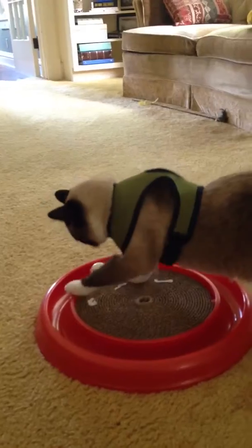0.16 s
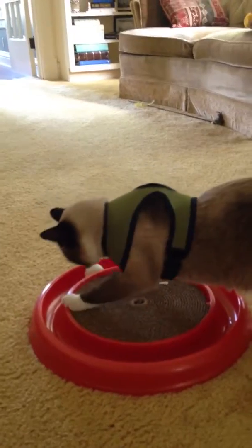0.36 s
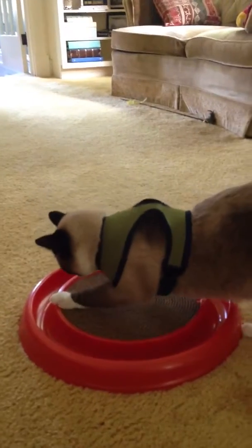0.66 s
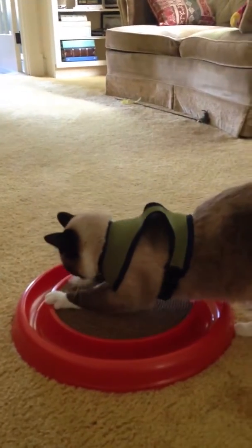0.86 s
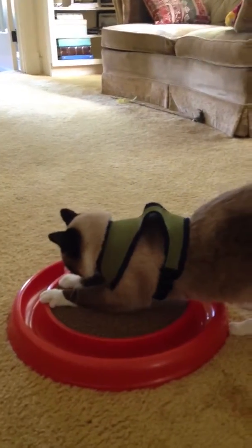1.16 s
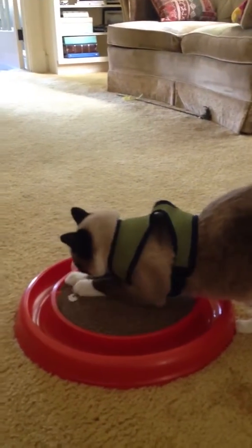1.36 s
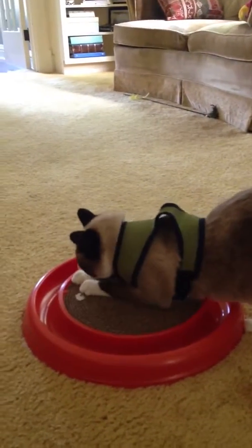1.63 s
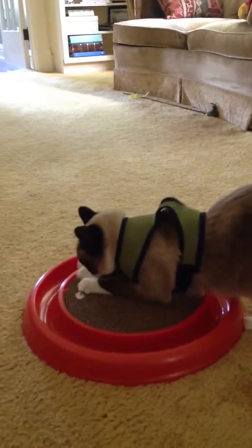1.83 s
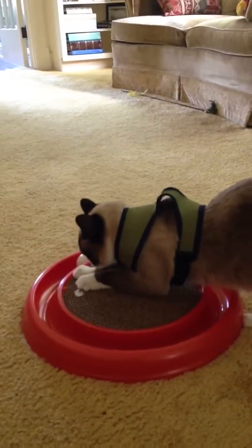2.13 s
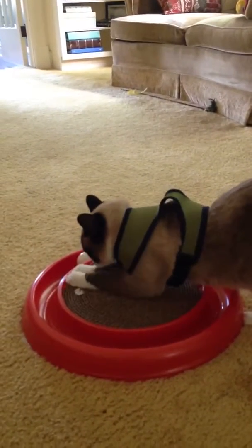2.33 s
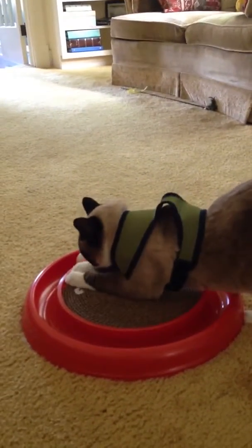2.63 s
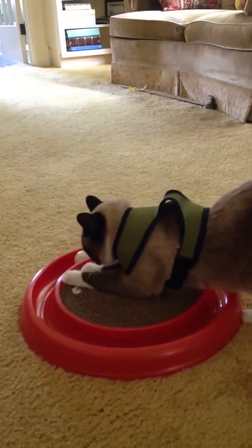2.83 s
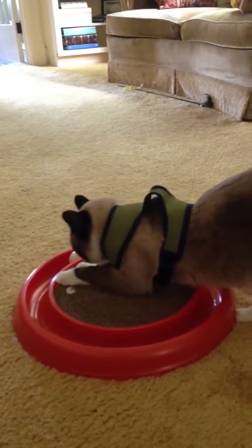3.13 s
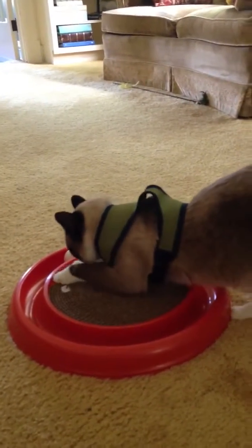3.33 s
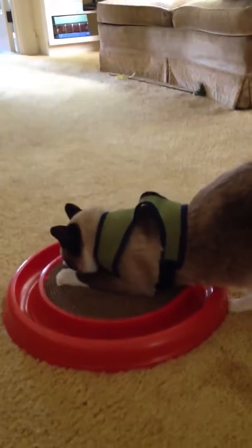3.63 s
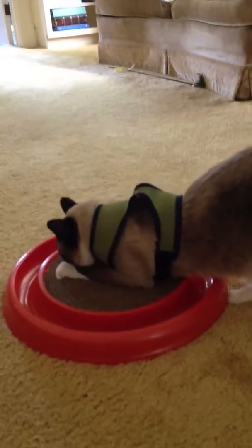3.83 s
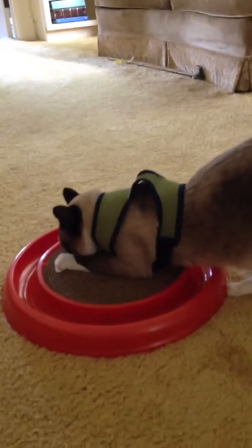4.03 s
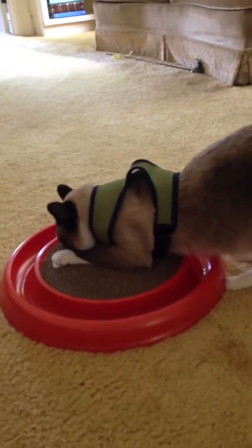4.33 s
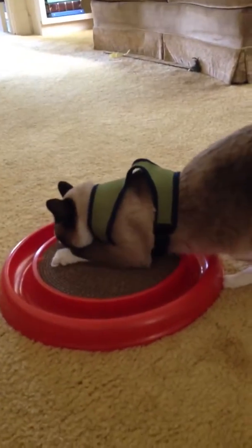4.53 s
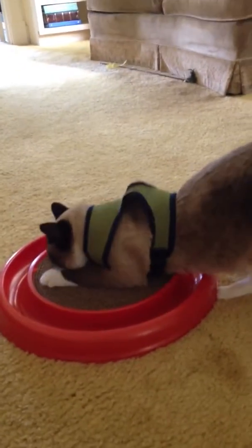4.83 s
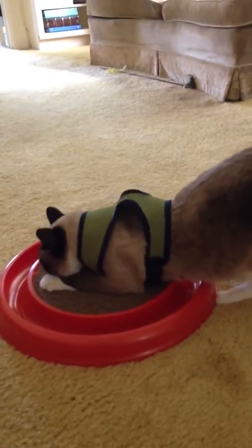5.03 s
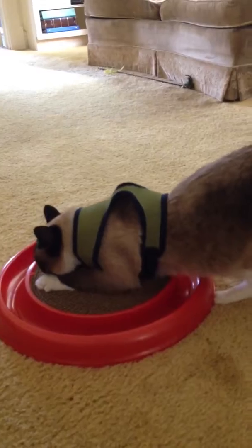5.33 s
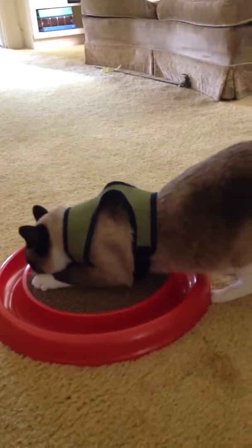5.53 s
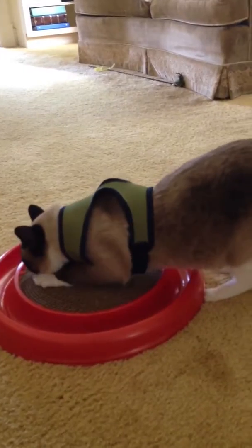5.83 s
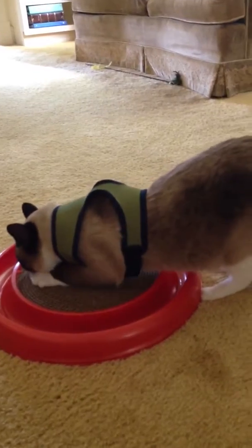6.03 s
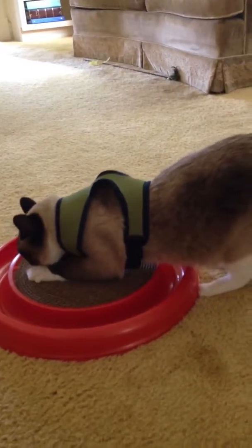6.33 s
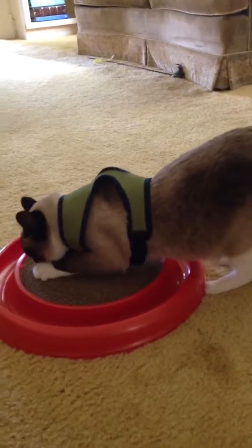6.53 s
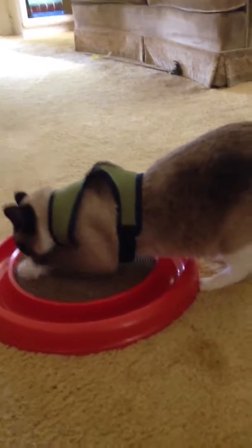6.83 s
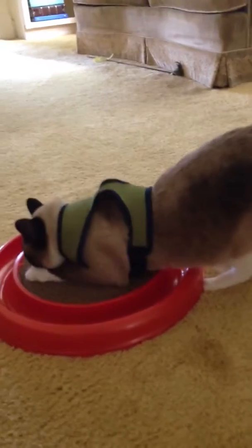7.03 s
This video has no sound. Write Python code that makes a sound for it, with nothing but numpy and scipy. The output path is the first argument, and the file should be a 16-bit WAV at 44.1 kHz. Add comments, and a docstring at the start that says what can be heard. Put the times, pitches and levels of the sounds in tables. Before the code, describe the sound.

A cat works its claws into a cardboard scratching pad set in a plastic ring. After faint first touches, dry papery snaps, tiny fibre ticks and short hollow thumps come irregularly, some single, some in tight pairs, with soft paw rustle between. Small carpeted living room with short damped echoes, close phone microphone, one channel, over a faint fading low hum and quiet hiss.

```python
"""A cat works its claws into a corrugated cardboard pad set in a round plastic tray, on a living-room carpet.
Each claw that lets go tears fibres (noisy tick), snaps a paper wall (short ringing) and thumps the pad
in its tray (low ringing). In between, paws rustle: thousands of tiny random breaks and skipping claw tips.
The ceiling and a small damped room answer with echoes and a tail, over a faint fading hum and hiss."""
import sys
import numpy as np
from scipy import signal
from scipy.fft import rfft, irfft
from scipy.io import wavfile
from scipy.ndimage import uniform_filter1d

SR = 44100
rng = np.random.default_rng(int(sys.argv[2]) if len(sys.argv) > 2 else 0)


def dump(signal):
    """Clip the signal to [-1, 1] and save it as 16-bit WAV at the path in sys.argv[1]."""
    limited = np.clip(np.atleast_2d(signal).T, -1, 1)
    pcm = np.round(limited * 32767).astype(np.int16)
    wavfile.write(sys.argv[1], SR, pcm)


N = 316638  # length in samples

# claws letting go: time [t/s], paper snap [f/Hz], snap [level/dB], edge crack [level/dB],
# fibre tick [level/dB], thump [f/Hz], thump [level/dB]
SNAGS = [(0.7955, 2140, -51.5, -51.5, -53, 176, -49.5), (0.8551, 2250, -63, -72, -85, 326, -60),
         (1.0417, 1400, -63, -89, -87, 308, -62.5), (1.109, 1568, -46.5, -47, -60, 275, -48.5),
         (1.3698, 1900, -66.5, -72, -71, 312, -76), (1.426, 1280, -69.5, -85, -79, 325, -57),
         (1.7812, 1880, -48, -61, -53.5, 280, -37.5), (1.7894, 1432, -62, -55, -80, 294, -36),
         (1.8008, 1570, -48.5, -65, -54.5, 256, -49), (1.9423, 1517, -28, -44, -50.5, 305.3, -31),
         (2.0545, 1536, -40.5, -64, -77, 290, -42), (2.2034, 1330, -52, -53, -57, 290, -45.5),
         (2.2165, 1860, -57.5, -79, -65, 323, -48), (2.3171, 1880, -68, -61.5, -62.5, 300, -54),
         (2.3475, 1520, -53, -83, -66, 318, -71), (2.4756, 1360, -52.5, -67, -60.5, 300, -48.5),
         (2.7099, 1515, -44, -86, -58.5, 288, -39.5), (2.8142, 1840, -34.5, -48.5, -48, 321, -34),
         (3.054, 1440, -61, -74, -84, 180, -84), (3.0852, 1366, -55.5, -65, -67, 200, -45),
         (3.0955, 1750, -33.5, -46, -47.5, 297.6, -39.5), (3.304, 1750, -39.5, -46.5, -49, 311, -40),
         (3.4344, 1888, -56.5, -80, -77, 271, -37), (3.7344, 1535, -58.5, -78, -75, 192, -62),
         (3.7982, 1520, -41.5, -46.5, -62, 275, -47.5), (3.9468, 1190, -45.5, -83, -80, 296, -35),
         (4.0379, 1990, -57, -83, -83, 275, -53.5), (4.2955, 1795, -25.5, -42, -48.5, 200, -35.5),
         (4.4189, 2080, -50, -75, -60, 293, -44), (4.4226, 1870, -42.5, -63, -53, 292, -40.5),
         (4.7509, 1590, -61, -94, -97, 310, -46), (5.207, 1494, -36.5, -45.5, -57, 273, -32),
         (5.6237, 1810, -49, -60, -62, 374.5, -52.5), (5.682, 1880, -32, -37, -38.5, 296, -27.5),
         (5.969, 3040, -63, -73.5, -59.5, 284.5, -52.5), (6.1204, 1310, -59.5, -59, -75, 228, -38.5),
         (6.13, 1220, -62, -65, -67, 294, -40), (6.3315, 2390, -46.5, -55, -80, 315.5, -40.5),
         (6.5808, 1840, -41.5, -61, -60, 333, -35.5), (6.606, 2270, -52.5, -52, -56, 278, -75),
         (6.8918, 1930, -68, -73, -67.5, 316, -57.5), (6.9557, 1940, -70.5, -76, -78, 317, -53.5)]
# a paper wall of the corrugation: multiple of the snap pitch [1], strength [level/dB], time to fall 60 dB [t/s]
PAPER_WALL = [(0.841, -6.5, 0.013), (1.0, 5, 0.002), (1.22, -8, 0.01), (1.62, -25, 0.009)]
# the plastic tray's ringing: pitch [f/Hz], strength [level/dB], time to fall 60 dB [t/s]
PLASTIC_TRAY = [(530, -1, 0.013), (709, 3.5, 0.0092), (811, -2.5, 0.015), (1225, -7, 0.0118)]
LEAD_S = .03  # the claw or paw starts to drag or scuff this long before its main moment


def undb(db):
    """Turn decibels into a plain factor."""
    return 10 ** (np.asarray(db) / 20)


def level(x, db):
    """Set the rms (average) level."""
    return x * undb(db) / np.sqrt(np.mean(x ** 2))


def blow(x, db):
    """Set the energy of a short sound, as a level over 10 ms."""
    return x * undb(db) * np.sqrt(.01 * SR / np.sum(x ** 2))


def fade(t, t60):
    """Exponential decay that starts at t = 0 and falls 60 dB in t60 seconds."""
    return (t >= 0) * np.exp(-np.log(1000) * np.maximum(t, 0) / t60)


def ring(t, modes, hz=1):
    """Fading tones struck at t = 0; neighbours swing in opposite directions."""
    total = 0
    for k, (f, db, t60) in enumerate(modes):
        total = total + (-1) ** k * undb(db) * fade(t, t60) * np.sin(2 * np.pi * f * hz * t)
    return total


def vary(modes):
    """Tones shift a little at random in pitch and level with every snag or bump."""
    return [(f * rng.normal(1, .03), db + rng.normal(0, 2), t60) for f, db, t60 in modes]


def colour(x, points, size=2048):
    """Shape the spectrum through (f/Hz, level/dB) points, with a filter that never sounds ahead of its input."""
    hz, db = np.transpose(points)
    f = np.maximum(np.fft.rfftfreq(size, 1 / SR), 1)
    gain = undb(np.interp(np.log(f), np.log(hz), db))
    # folding the cepstrum gathers the filter's energy at its start
    cepstrum = irfft(np.log(gain))
    cepstrum[1:size // 2] *= 2
    cepstrum[size // 2 + 1:] = 0
    impulse = irfft(np.exp(rfft(cepstrum)))
    return signal.fftconvolve(x, impulse)[:len(x)]


def cut(x, hz, kind, order=2):
    """Low-pass, high-pass or band-pass."""
    return signal.sosfilt(signal.butter(order, np.minimum(hz, .45 * SR), kind, fs=SR, output="sos"), x)


def walk(rate):
    """Slow random drift with a spread of 1."""
    k = int(SR / rate)
    steps = np.repeat(rng.standard_normal(N // k + 1), k)
    drift = uniform_filter1d(uniform_filter1d(steps, k), k)[:N]
    return drift / drift.std()


def crackle(count, rate, spread_db):
    """Tiny breaks at random moments (rate per second), of very uneven size."""
    breaks = rng.random(count) < rate / SR
    return breaks * rng.standard_normal(count) * undb(spread_db * rng.standard_normal(count))


def claws(count=4):
    """Every snag and bump at its moment, dealt in turn to a few groups; each group gets its own random room tail."""
    # paws pressing the pad down into its tray: time [t/s], thump [f/Hz], thump [level/dB]
    bumps = [(0.762, 246, -49.5), (1.568, 274, -56), (1.843, 209, -39.5), (4.1313, 290, -46.5),
             (4.8219, 289, -51.5), (5.2208, 311, -36), (5.669, 280, -37), (6.1798, 296, -44),
             (6.586, 179, -41.5), (7.037, 330, -64)]
    groups = np.zeros((count, N + SR))
    events = [(s, snag(*row)) for s, *row in SNAGS]
    events += [(s, bump(*row)) for s, *row in bumps]
    for k, (s, sound) in enumerate(events):
        start = int((s - LEAD_S) * SR)
        groups[k % count, start:start + len(sound)] += sound
    return sum(room(group[:N]) for group in groups)


def snag(snap_hz, snap_db, crack_db, tick_db, thump_hz, thump_db, count=4096):
    """A claw drags, fibres part, a paper wall flicks free and slaps the next; the heavier pad and tray ring too."""
    # tearing fibres: pitch [f/Hz], strength [level/dB]
    fibres = [(1500, -6.5), (3000, -1), (4400, -3), (5500, -3.5), (7900, 0), (10300, -8.5), (12500, -15),
              (16000, -25.5)]
    # the stiff cut edge of the card: pitch [f/Hz], strength [level/dB], time to fall 60 dB [t/s]
    card_edge = [(3410, 0.5, 0.0075), (3560, 0, 0.0046), (4066, 6, 0.0041)]
    t = np.arange(count) / SR - LEAD_S
    # the claw slips in small jerks, harder as the load grows
    jerks = crackle(count, rate=2300, spread_db=2) * fade(-t, 0.04)
    drag = cut(jerks, (230, 2400), "band", order=3)
    # the drag grows with the snap (9 dB below it) until the claw slips freely
    drag_db = min(snap_db - 9, -52.5)
    # most fibres part at once, a few straggle
    tear = blow(crackle(count, rate=15000, spread_db=3) * fade(t, 0.0065), 0)
    stragglers = blow(crackle(count, rate=1500, spread_db=4) * fade(t, .035), -10)
    tick = colour(tear + stragglers, fibres)
    crack = ring(t, vary(card_edge))
    # the wall meets its neighbour after two swings
    slap_s = 2 / snap_hz
    wall = vary(PAPER_WALL)
    flick = ring(t, wall, snap_hz) + undb(-5) * ring(t - slap_s, wall, snap_hz)
    # frayed edges turn the paper's ring into a crunch
    fray = cut(crackle(count, rate=12000, spread_db=5) * fade(t, 0.032), 1130, "high", order=3)
    snap = cut(blow(flick, 0) + blow(fray, -3.2), (1080, 3600), "band", order=5)
    paper = blow(drag, drag_db) + blow(snap, snap_db) + blow(crack, crack_db) + blow(tick, tick_db)
    # snap and thump both knock the tray, 3.5 dB under their mean
    knock_db = (snap_db + thump_db) / 2 - 3.5
    return paper + tray(t, knock_db, thump_hz, thump_db)


def tray(t, knock_db, thump_hz, thump_db):
    """The pad bounces with low fading tones and, half a millisecond later, the plastic tray under it knocks."""
    # the pad bouncing: multiple of the thump pitch [1], strength [level/dB], time to fall 60 dB [t/s]
    pad = [(0.562, -15, 0.058), (.88, 1.5, 0.057), (1.1, 4.5, 0.025)]
    knock = cut(ring(t - .0005, vary(PLASTIC_TRAY)), (300, 1500), "band")
    thump = cut(ring(t, pad, thump_hz), 150, "high", order=3)
    return blow(knock, knock_db) + blow(thump, thump_db)


def bump(thump_hz, thump_db, count=4096):
    """A soft paw scuffs the card and pushes the pad against the tray."""
    t = np.arange(count) / SR - LEAD_S
    scuff = cut(crackle(count, rate=4300, spread_db=11) * fade(np.abs(t), 0.033), (400, 2600), "band")
    # a soft paw stirs the paper and the tray only a little
    scuff_db, knock_db = thump_db - 23, thump_db - 17.5
    return blow(scuff, scuff_db) + tray(t, knock_db, thump_hz, thump_db)


def paws(count=1024):
    """Soft pads rustle in fits and starts over the cut edges of the card; claw tips skip from wall to wall."""
    # the rustle's colour: pitch [f/Hz], strength [level/dB]
    rustle_colour = [(120, -21), (300, 14), (600, 2), (1000, -8.5), (1900, -4), (3200, -8), (6000, -17),
                     (15000, -16.5)]
    skip_hz, skip_db = 1600, -3.5  # pitch of the skipped walls, and their level over the rustle
    fits_db = 3 * walk(30)
    grains = crackle(N, rate=2000, spread_db=4.0) * undb(fits_db)
    rustle = level(colour(grains, rustle_colour), 0)
    t = np.arange(count) / SR
    wall = blow(ring(t, PAPER_WALL, skip_hz), 0) + blow(ring(t, PLASTIC_TRAY), 3)
    skips = signal.oaconvolve(crackle(N, rate=200, spread_db=3), wall)[:N]
    return room((rustle + level(skips, skip_db)) * rubbing())


def rubbing():
    """How hard the paws rub: a light shuffle, a slide after each snag and some short strokes."""
    # short paw scrapes, alone or along with a snag: middle [t/s], length [t/s], strength [level/dB]
    scrapes = [(0.672, 0.021, -61), (0.774, 0.027, -59), (1.109, 0.023, -53.5), (1.295, .02, -66),
               (1.341, 0.018, -62), (1.402, .05, -69), (3.939, 0.022, -57.5), (6.597, 0.02, -45.5),
               (4.046, 0.11, -67), (5.086, 0.065, -70), (5.475, 0.064, -70), (5.678, 0.025, -43.5),
               (6.118, 0.022, -52), (6.175, 0.0089, -77), (7.04, 0.012, -68.5), (7.097, 0.018, -64.5)]
    # the paws shuffle from the moment they settle, more as the cat leans in
    settle_s, shuffle_db, lean_db_per_s = 0.83, -82, 0.56
    # after a snag the freed paw slides on (dB over the thump) and comes to rest
    slide_db, slide_t60_s = -23.5, .35
    t = np.arange(N) / SR
    shuffle = (t > settle_s) * undb(shuffle_db + lean_db_per_s * (t - settle_s))
    slides = sum(undb(thump_db + slide_db) * fade(t - s, slide_t60_s) for s, *_, thump_db in SNAGS)
    strokes = sum(undb(db) * np.exp(-(2 * (t - s) / length) ** 2) for s, length, db in scrapes)
    return shuffle + slides + strokes


def room(x, count=16384):
    """Add a few early echoes and a short tail that loses its treble first."""
    # the tail's strength: pitch [f/Hz], strength [level/dB]
    tail_bands = [(90, 7), (170, -8), (320, -12.5), (600, -4), (1200, -12), (2400, -9.5), (4500, -14.5),
                  (9000, -18), (15000, -6.5)]
    # carpet and sofa soak it up quickly: pitch [f/Hz], time to fall 60 dB [t/s]
    soaking = [(150, .3), (600, .24), (2500, .24), (15000, .13)]
    # the room's standing waves: pitch [f/Hz], strength [level/dB], time to fall 60 dB [t/s]
    standing = [(167.8, -76, 0.28), (255.2, -89, 0.42), (312.3, -67.5, 0.27)]
    # ceiling and furniture: delay [t/s], strength [level/dB], low-pass [f/Hz]
    echoes = [(.0058, -12, 2006), (0.0123, -12.5, 4097), (0.0157, -10.5, 700), (0.0174, -21.5, 5600),
              (0.03, -24.5, 1492)]
    t = np.arange(count) / SR
    hz, db = np.transpose(tail_bands)
    t60 = np.interp(hz, *np.transpose(soaking))
    log_f = np.log(np.maximum(np.fft.rfftfreq(count, 1 / SR), 1))
    noise = rfft(rng.standard_normal(count))
    tail = ring(t - .013, standing)
    build_up = np.clip((t - .004) / 0.0092, 0, 1)
    # each band of noise fades at its own pace; neighbouring bands overlap
    for k, share in enumerate(np.eye(len(hz))):
        shape = fade(t, t60[k]) * build_up
        band = irfft(noise * np.interp(log_f, np.log(hz), share))
        tail = tail + undb(db[k]) * band * shape / np.sqrt(np.sum(shape ** 2))
    for s, echo_db, top_hz in echoes:
        # soft surfaces smear each echo in time
        smear = np.maximum(1 - np.abs(2 * top_hz * (t - s)), 0)
        tail = tail + undb(echo_db) * smear / smear.sum()
    return x + signal.oaconvolve(x, tail)[:N]


def background():
    """An appliance's wavering hum slowly fades in quiet, hissing air whose low murmur swells and sinks."""
    # still air and microphone hiss: pitch [f/Hz], strength [level/dB]
    air_colour = [(25, -17), (60, -12), (95, -5), (135, 13), (200, 16), (300, 9), (500, 3), (1000, -5),
                  (1800, -5), (3500, -3), (8000, -5), (15000, -6)]
    hum_hz, hum_db, hum_db_per_s = 166.5, -69.5, -1.5  # mean pitch, level before the fade, fade
    air_db = -65.5  # before the murmur moves
    murmur_hz, murmur_swell_db = 450, 3  # the murmur lies below this pitch; spread of its level
    turns = np.cumsum(1 + 0.004 * walk(3.5)) / SR
    hum_change_db = hum_db_per_s * np.arange(N) / SR + walk(14)
    hum = level(np.sin(2 * np.pi * hum_hz * turns), hum_db) * undb(hum_change_db)
    air = level(colour(rng.standard_normal(N), air_colour), air_db)
    # add or take away low air so that it moves around 2 dB below its plain level
    murmur_change = undb(murmur_swell_db * walk(5) - 2) - 1
    murmur = cut(air, murmur_hz, "low", order=1) * murmur_change
    return hum + air + murmur


def scene():
    """The cat and the quiet room, in one channel."""
    return (claws() + paws() + background())[None]


def record(dry):
    """The phone thins the deep bass and cuts the top."""
    thinned = cut(dry, 76, "high", order=1)
    top_cut = signal.ellip(10, .2, 70, 15550, fs=SR, output="sos")  # steep low-pass at 15550 Hz
    return signal.sosfilt(top_cut, thinned)


dry = scene()
out = record(dry)
dump(out)
```